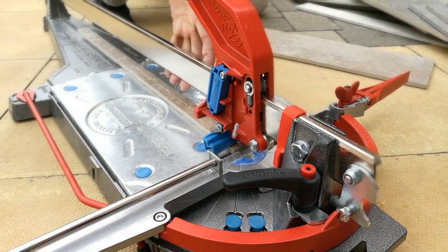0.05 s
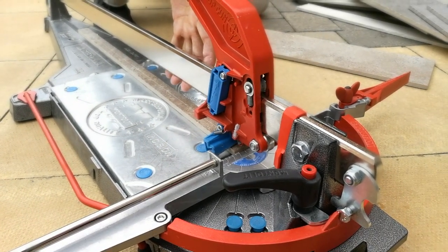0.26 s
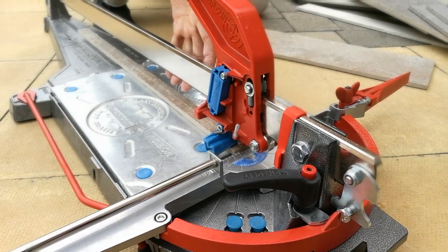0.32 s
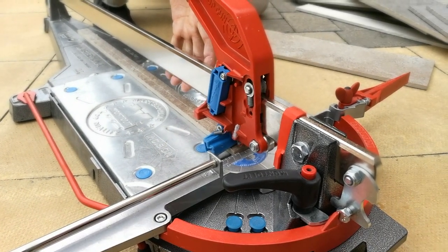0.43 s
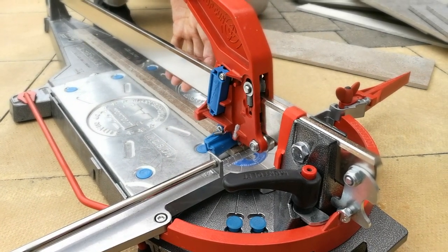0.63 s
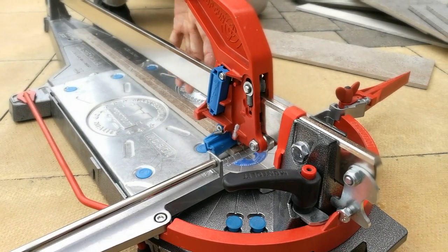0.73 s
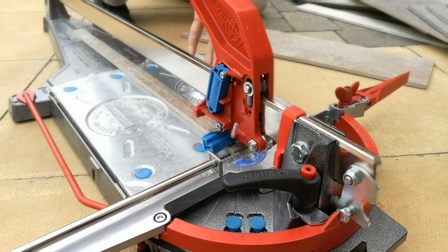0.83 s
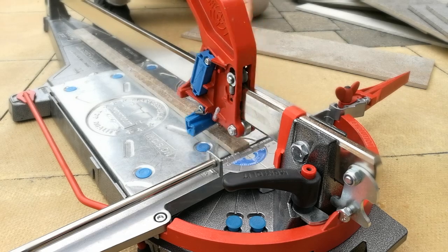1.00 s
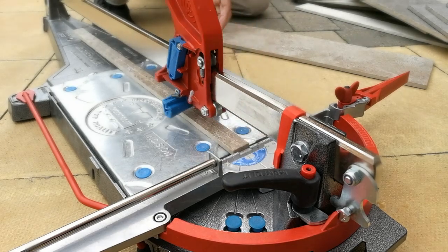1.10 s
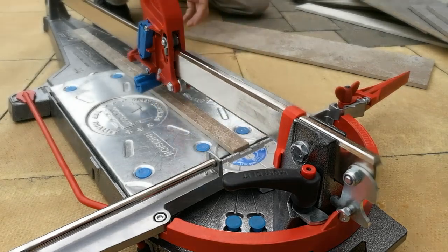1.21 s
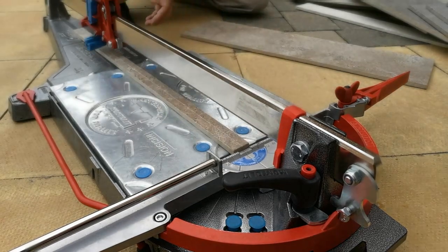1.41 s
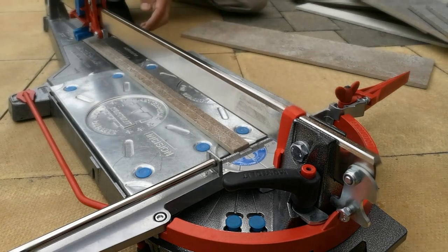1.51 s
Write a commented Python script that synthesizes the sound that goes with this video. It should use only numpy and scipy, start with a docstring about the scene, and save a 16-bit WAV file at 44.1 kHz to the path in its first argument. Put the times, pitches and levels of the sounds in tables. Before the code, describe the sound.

A tile snaps on a manual cutter outdoors, heard close. A soft knock and low frame rumble lead to a hard, bright crack at 0.2 seconds, with pieces clattering on ringing steel until 0.3. Dull lever knocks come around 0.5 to 0.64. The head then scrapes grittily along its rail, bearings whirring up in pitch to about 1.05, falling and fading by 1.5, over faint air noise.

```python
"""A soft knock and a low rumble of the loaded frame, then a scored tile snaps on a manual tile cutter outdoors.
The halves clatter on the steel bed: each contact is a noisy crack, ringing steel and the yard's answer.
The lever is lifted with a few soft knocks, then the cutting head is pushed back along its rail.
Its bearings whirr, gliding sines that rise and fall with its speed, and it scrapes grittily:
shaped noise and short ringing grains, with the rail and head resonating."""
import sys
import numpy as np
from scipy import signal
from scipy.fft import rfft, irfft, next_fast_len
from scipy.io import wavfile
from scipy.ndimage import map_coordinates

SR = 44100
rng = np.random.default_rng(int(sys.argv[2]) if len(sys.argv) > 2 else 0)


def materialize(psi):
    """Save the field psi as 16-bit PCM at rate SR to the path in sys.argv[1].

    A 1-D psi becomes a single channel; in a 2-D psi each row is a channel.
    """
    bounded = np.clip(np.atleast_2d(psi).T, -1, 1)
    quanta = np.round(bounded * 32767).astype(np.int16)
    wavfile.write(sys.argv[1], SR, quanta)


N = 68355  # length in samples
TIME = np.arange(N) / SR  # seconds
FFT_SIZE = next_fast_len(N + 4096, True)
GRID = np.fft.rfftfreq(FFT_SIZE, 1 / SR)  # the frequencies used for filtering, in Hz
ATTACK_S = 0.0015  # how softly each contact and each grain starts


def amp(db):
    """Turn decibels into a plain gain."""
    return 10 ** (np.asarray(db) / 20)


def unit(x):
    """Scale to an rms of 1."""
    return x / np.sqrt(np.mean(x ** 2) + 1e-20)


def along(points, hz):
    """Read (Hz, value) points with straight lines on a log frequency axis."""
    f, value = np.transpose(points)
    return np.interp(np.log(hz + 1), np.log(f + 1), value)


def curves(rows):
    """One value per sample for each column after the time."""
    seconds, *columns = np.transpose(rows)
    return [np.interp(TIME, seconds, column) for column in columns]


def wobble(rate):
    """A smooth random curve with this many knots a second."""
    knots = rng.standard_normal(int(N * rate / SR) + 4)
    return map_coordinates(knots, [np.arange(N) * rate / SR])


def filtered(x, gain):
    """Multiply each frequency of x by its gain."""
    return irfft(rfft(x, FFT_SIZE) * gain, FFT_SIZE)[..., :N]


# How alike left and right are.
# Each row: frequency in Hz, likeness from 0 (unrelated) to 1 (the same).
LIKENESS = [(60, .85), (150, .65), (400, 0), (1100, 0.8), (2200, 0), (5000, 0.15), (14000, 0)]


def apart(hz):
    """Opposite phase shifts for left and right, wider where they are less alike."""
    angle = np.arccos(np.clip(along(LIKENESS, hz), -1, 1))
    return np.array([[.5], [-.5]]) * angle


def noise(spectrum):
    """Stereo noise with the given spectrum, at rms 1: a shared part plus a part of opposite sign."""
    turn = apart(GRID)[0]
    shares = np.array([np.cos(turn), np.sin(turn)])
    mid, side = filtered(rng.standard_normal((2, N)), amp(along(spectrum, GRID)) * shares)
    return unit(np.array([mid + side, mid - side]))


def sides(pan, hz):
    """Left and right gains with the same total power at every frequency."""
    difference_db = along(pan, hz)
    gains = amp(np.array([difference_db, -difference_db]) / 2)
    return gains / np.sqrt(np.mean(gains ** 2, axis=0))


def dying(colour, stages, size=512):
    """A dense stereo noise ring; every (dB, t60 table) stage lets each frequency die at its own speed."""
    hz = np.fft.rfftfreq(size, 1 / SR)
    t = np.arange(0, .5, size / 2 / SR)
    a, b = rng.standard_normal((2, len(hz), 2 * len(t))).view(complex)
    turn = apart(hz)[:, :, None]
    stereo = np.cos(turn) * a + np.sin(turn) * b
    # t60 is the time in which a frequency falls by 60 dB; the stages add as powers
    power = sum(amp(db - 60 * t / along(t60s, hz)[:, None]) ** 2 for db, t60s in stages)
    frames = stereo * np.sqrt(power) * colour(hz)[..., None]
    return signal.istft(frames, nperseg=size)[1] / np.sqrt(size / 2)


def ringing(x, tail):
    """Ring x through a tail, scaled so that its left side has energy 1."""
    return signal.fftconvolve(x, tail / np.linalg.norm(tail[0]), axes=1)[:, :N]


def resonances(modes):
    """The response of a set of modes: each one boosts a narrow band around its own pitch."""
    return sum(amp(db) * 1j * GRID * width / (centre * centre - GRID ** 2 + 1j * GRID * width)
               for centre, width, db in modes)


# The colour of the outdoor air.
# Each row: frequency in Hz, relative level in dB per Hz.
AIR_SPECTRUM = [(25, 2.5), (70, -2.5), (150, -17), (300, -18.5), (1000, -8.5), (4000, -34), (15000, -37.5)]


def outdoor_air():
    """Quiet steady noise, mostly low."""
    return amp(-79.5) * noise(AIR_SPECTRUM)


# How loud the loaded frame rumbles.
# Each row: time in seconds, level in dB.
FRAME_LEVEL = [(.03, -70), (.075, -63.5), (.15, -61), (.2, -68.5), (.4, -70), (.48, -66), (.55, -90)]
# The colour of that rumble.
# Each row: frequency in Hz, relative level in dB per Hz.
FRAME_SPECTRUM = [(25, -11), (60, -9), (110, -8), (200, -24.5), (500, -52)]


def frame_rumble():
    """The frame rumbles low while the lever is pressed: deep noise that swells and fades."""
    level_db, = curves(FRAME_LEVEL)
    return amp(level_db) * noise(FRAME_SPECTRUM)


def thud():
    """The frame drops as the tile gives way: one low push on the ground, a sine that dies at once."""
    start_s, pitch_hz, decay_s = .219, 45.3, 0.0063
    t = np.maximum(TIME - start_s, 0)
    return amp(-34.5) * np.sin(2 * np.pi * pitch_hz * t) * np.exp(-t / decay_s)


# The speed of the head, heard as the pitch of its bearings.
# Each row: time in seconds, pitch in Hz before a slight random jitter.
WHIRR_PITCH = [(.66, 480), (.72, 525), (.775, 520), (.82, 760), (.86, 1120), (.9, 1360), (.95, 1630),
               (1.0, 1790), (1.025, 2010), (1.06, 2070), (1.11, 1850), (1.17, 1480), (1.22, 1240),
               (1.265, 1030), (1.305, 830), (1.35, 810), (1.39, 700), (1.44, 500)]
# How loud the whirr is.
# Each row: time in seconds, relative level in dB.
WHIRR_LEVEL = [(.63, -120), (.68, -51.5), (.74, -42), (.757, -53), (.8, -44.5), (.87, -41.5), (.93, -33.5),
               (.99, -41), (1.04, -30), (1.11, -41.5), (1.16, -42.5), (1.23, -37), (1.266, -31),
               (1.28, -38), (1.31, -41.5), (1.345, -34.5), (1.38, -45.5), (1.425, -45.5), (1.49, -100)]
# The sines that make up the whirr.
# Each row: multiple of the pitch, relative level in dB.
WHIRR_PARTIALS = [(.5, -28), (1, -1), (1.95, -8)]
# How well the head radiates.
# Each row: frequency in Hz, gain in dB.
WHIRR_RADIATION = [(330, -35.5), (500, -2), (2100, -4), (2600, -6), (3600, -46)]
# The modes of the rail, which the scrape rings too.
# Each row: frequency in Hz, width in Hz, relative level in dB.
RAIL_MODES = [(460, 25, -0.5), (543.7, 67, -0.5), (811.4, 15, -2.5), (1050, 27, 1), (1147, 90, -6.5),
              (1372, 21, -1), (1635, 50, -5), (1667, 25, 0), (1774, 150, -6.5), (1916.6, 15, 4),
              (2033, 17, -10.5), (2433, 49, 3.5)]


def bearings():
    """A rough whirr that follows the speed of the head and swells where it crosses a mode of the rail."""
    jitter = .02  # as a share of the pitch
    flutter_db, side_swell_db = 3, 4.5  # the partials beside the pitch come and go more
    (pitch,), (level_db,) = curves(WHIRR_PITCH), curves(WHIRR_LEVEL)
    whirr = np.zeros((2, N))
    for multiple, partial_db in WHIRR_PARTIALS:
        hz = multiple * pitch
        phase = 2 * np.pi * np.cumsum(hz * (1 + jitter * wobble(250))) / SR
        flutter = flutter_db * wobble(120)
        swell = side_swell_db * abs(multiple - 1) * wobble(35.4)
        gain_db = level_db + partial_db + along(WHIRR_RADIATION, hz) + flutter + swell
        whirr += amp(gain_db) * np.sin(phase + apart(hz))
    return 2 * (whirr + filtered(whirr, resonances(RAIL_MODES)))


def dust_grains():
    """Grains of tile dust: clicks at random times, about 600 a second, of uneven size and either sign."""
    spread_db = 5
    chance, size = rng.random(N), rng.standard_normal(N)
    strength = amp(spread_db * np.clip(size, -2, 2))
    return (chance < 600 / SR) * strength * rng.choice([-1, 1], N)


def friction(grains, spectrum):
    """Fine rubbing noise, with grains of tile dust that each ring the metal briefly."""
    length = SR // 10
    ring = dying(lambda hz: amp(along(spectrum, hz)), [(0, [(1, .045)])])[:, :length]
    ring = ring * (1 - np.exp(-np.arange(length) / SR / ATTACK_S))
    return unit(noise(spectrum) + amp(0.5) * unit(ringing(grains[None], ring)))


# How loud the scrape is.
# Each row: time in seconds, relative level of the body in dB, of the grit in dB, of the fizz in dB.
SCRAPE_LEVELS = [(.625, -110, -120, -120), (.648, -41.5, -64, -71), (.735, -47.5, -64, -72),
                 (.757, -52.5, -70, -77), (.79, -40, -58, -65), (.86, -39.5, -52.5, -60),
                 (.906, -36, -42.5, -49), (1.06, -35, -42, -46), (1.12, -35.5, -42.5, -50.5),
                 (1.17, -37.5, -44, -49), (1.25, -38, -48.5, -55.5), (1.285, -36.5, -43.5, -49),
                 (1.32, -41.5, -54.5, -64), (1.345, -40, -48.5, -59), (1.395, -35.5, -53, -62.5),
                 (1.415, -40.5, -52.5, -58), (1.435, -47.5, -68, -78), (1.48, -57, -68.5, -80),
                 (1.55, -88, -100, -110)]
# The colours of the scrape, from low to high: body, grit and fizz.
# Each row: frequency in Hz, relative level in dB per Hz.
BODY_SPECTRUM = [(100, -76), (250, -37.5), (385, -25.5), (480, -3), (700, 1.5), (1100, 1.5), (1400, -5.5),
                 (1900, 3.5), (2400, -6), (2900, -6.5), (3600, -21), (6000, -58.5)]
GRIT_SPECTRUM = [(600, -62), (1800, -38), (2900, 3.5), (3600, 0.5), (4400, 0), (5000, 1), (5800, -2),
                 (7000, -1), (8500, -31.5)]
FIZZ_SPECTRUM = [(2000, -71.5), (5500, -42), (7100, 1.5), (8500, -4), (11000, -7.5), (13000, -18),
                 (15000, -16.5), (16000, -34)]
# The modes of the head.
# Each row: frequency in Hz, width in Hz, relative level in dB.
HEAD_MODES = [(3500, 22, 3), (4954, 25, 8), (5010, 25, 1), (5690, 25, 1.5), (6700, 120, -8.5)]
# Where the slide sits between the ears.
# Each row: frequency in Hz, left minus right in dB.
SLIDE_SIDES = [(60, -9), (99, -16), (160, 11.5), (270, -7.5), (450, -3.5), (740, -11.5), (1220, -1),
               (2010, -9), (3330, 10), (5500, -2), (9080, -12.5), (15000, -8)]
# How long the yard rings, after the slide and after each blow.
# Each row: frequency in Hz, time to fall by 60 dB in seconds.
YARD_DECAY = [(200, 0.43), (2000, 0.33), (6000, 0.21), (14000, 0.14)]


def slide():
    """The head runs along the rail: friction rings the modes of rail and head under the whirr."""
    rail_db, head_db = 3, -6
    scrape_db, chatter_db, yard_db = -2, 1.5, -12
    body_db, grit_db, fizz_db = curves(SCRAPE_LEVELS)
    grains = dust_grains()
    body = friction(grains, BODY_SPECTRUM)
    body += amp(rail_db) * unit(filtered(noise(BODY_SPECTRUM), resonances(RAIL_MODES)))
    grit = friction(grains, GRIT_SPECTRUM)
    grit += amp(head_db) * unit(filtered(noise(GRIT_SPECTRUM), resonances(HEAD_MODES)))
    fizz = friction(grains, FIZZ_SPECTRUM)
    treble = np.sqrt(2) * (amp(grit_db) * grit + amp(fizz_db) * fizz)
    chatter = amp(scrape_db + chatter_db * wobble(60.49))
    direct = chatter * (amp(body_db) * body + treble) + bearings()
    yard = ringing(direct, dying(np.ones_like, [(0, YARD_DECAY)]))
    return filtered(direct + amp(yard_db) * yard, sides(SLIDE_SIDES, GRID))


# Where the blows sit between the ears.
# Each row: frequency in Hz, left minus right in dB.
BLOW_SIDES = [(60, 5.5), (99, 10.5), (160, -2), (270, 4), (450, -2), (740, -13.5), (1220, 0.5), (2010, -9),
              (3330, 11.5), (5500, -4), (9080, -12), (15000, -9.5)]


def blow_tone(hz, bass_db, treble_db):
    """Left and right gains of one blow, with its bass and treble raised or lowered."""
    bass = bass_db / (1 + (hz / 794) ** 2)
    treble = treble_db * (1 - 1 / (1 + (hz / 4200) ** 4))
    return sides(BLOW_SIDES, hz) * amp(bass + treble)


# The tile breaks and lands; the soft knocks of lever and head, one before the break and the rest after.
# Each row: start in seconds, level in dB, bass in dB, treble in dB, ring in dB.
TILE_BLOWS = [(.2003, -15.5, -7.5, 10, -1.5), (.2165, -17, -15, 6, -2), (.2195, -13, 1, 7, -3.5),
              (.2235, -13.5, 5, 2.5, -3), (.253, -21.5, -5, 4.5, -4.5), (.285, -28, -0.5, -4, 2.5)]
SOFT_KNOCKS = [(.0, -39.5, 6, 11.5, -7.5), (0.4937, -40, -7, -20.5, -1.5), (.499, -40.5, 7.5, -29, -3),
               (.525, -57.5, -8, 8, 12), (.536, -42, -1.5, -20, 0), (0.544, -58.5, 4, 6, -1.5),
               (0.553, -54, 5, 10, 3.5), (0.6364, -42, 6, 9, -10)]
# The modes of the steel bed.
# Each row: frequency in Hz, relative level in dB, time to fall by 60 dB in seconds.
BED_MODES = [(165, -28, .38), (540, -7, .24), (630, -2, .11), (830, -12, .26), (1058, -4, .16),
             (1112, -6, .22), (1612, -7, .23), (1662, -3, .22), (1788, -3, .22), (1846, -5, .24),
             (2077, -4, .27), (2533, -2, .19), (2638, -3, .27), (2767, -8, .2), (3106, -8, .2),
             (3490, -5, .16), (3555, -8, .19), (3617, -7, .16)]
# The colour of the ceramic and steel crack.
# Each row: frequency in Hz, relative level in dB per Hz.
CRACK_SPECTRUM = [(59, -78.5), (100, -39.5), (614, -3.5), (898, -9.5), (1090, 0), (1310, -15), (1660, 1.5),
                  (2580, -0.5), (3250, -8.5), (3540, -6), (4100, -10), (10800, -20.5), (15500, -29)]
# How long the crack lasts.
# Each row: frequency in Hz, time to fall by 60 dB in seconds.
CRACK_DECAY = [(300, 0.071), (2000, 0.065), (6000, .08), (14000, 0.027)]


def blows(rows):
    """Each contact is a dense ceramic and steel crack, the bed's ringing modes and the yard's answer."""
    bed_db, yard_db = -8.5, -13
    out = np.zeros((2, 2 * N))  # room for the last tail
    t = np.arange(SR // 2 - 1024) / SR
    mode_hz, mode_db, t60 = np.transpose(BED_MODES)
    mode_fade = amp(bed_db + mode_db[:, None] - 60 * t / t60[:, None])
    modes = mode_fade * np.exp(2j * np.pi * mode_hz[:, None] * t)
    for start_s, level_db, bass_db, treble_db, ring_db in rows:
        def colour(hz):
            return blow_tone(hz, bass_db, treble_db) * unit(amp(along(CRACK_SPECTRUM, hz)))

        # the ring setting moves the yard and the bed together
        crack = dying(colour, [(0, CRACK_DECAY), (yard_db + ring_db, YARD_DECAY)])[:, :len(t)]
        phase = 2 * np.pi * rng.random(len(mode_hz)) + apart(mode_hz)
        ring = ((blow_tone(mode_hz, bass_db, treble_db) * np.exp(1j * phase)) @ modes).imag
        attack = 1 - np.exp(-t / ATTACK_S)
        start = round(start_s * SR)
        out[:, start:start + len(t)] += amp(level_db) * (crack + amp(ring_db) * ring) * attack
    return out[:, :N]


def scene():
    """The snap, the knocks and the slide, in the open air."""
    return blows(TILE_BLOWS + SOFT_KNOCKS) + thud() + slide() + outdoor_air() + frame_rumble()


def record(dry):
    """Cut the very top of the treble steeply, above 15.9 kHz."""
    return filtered(dry, 1 / np.sqrt(1 + (GRID / 15900) ** 160))


dry = scene()
out = record(dry)
materialize(out)
```